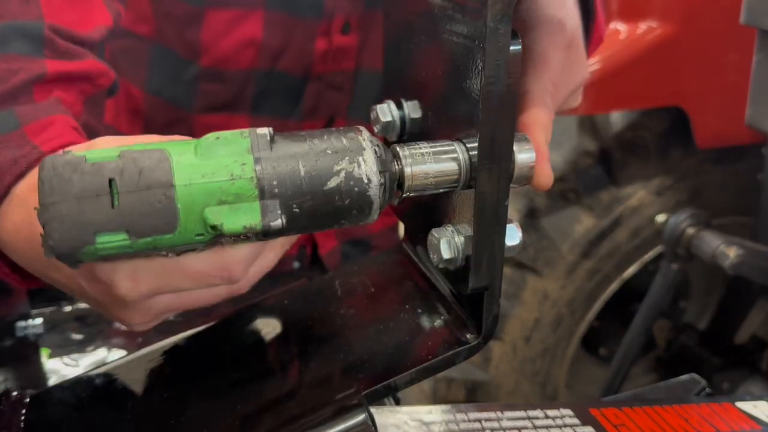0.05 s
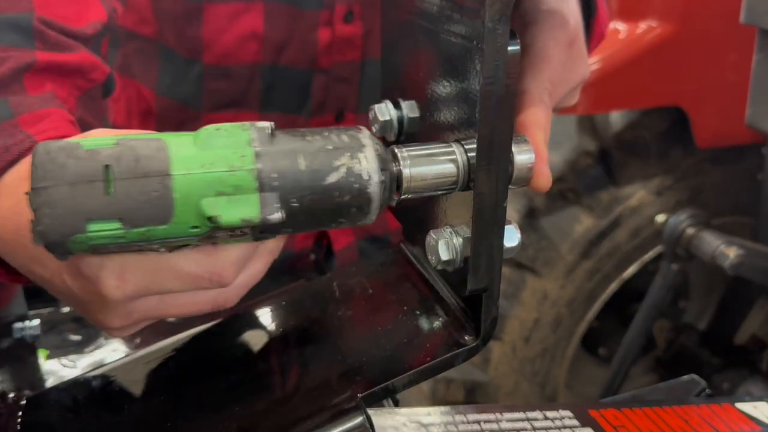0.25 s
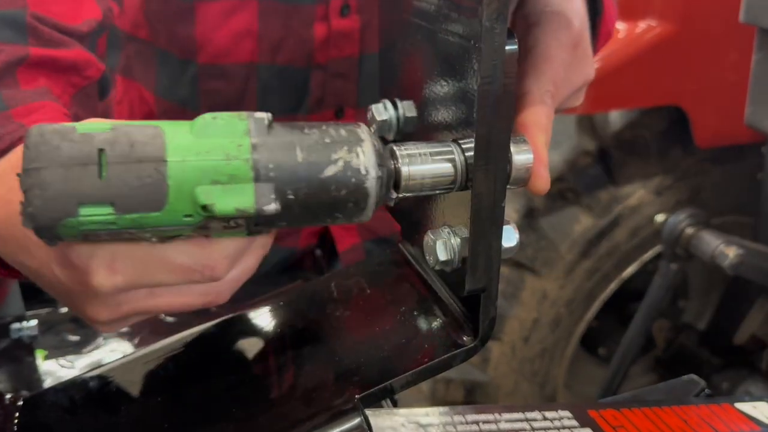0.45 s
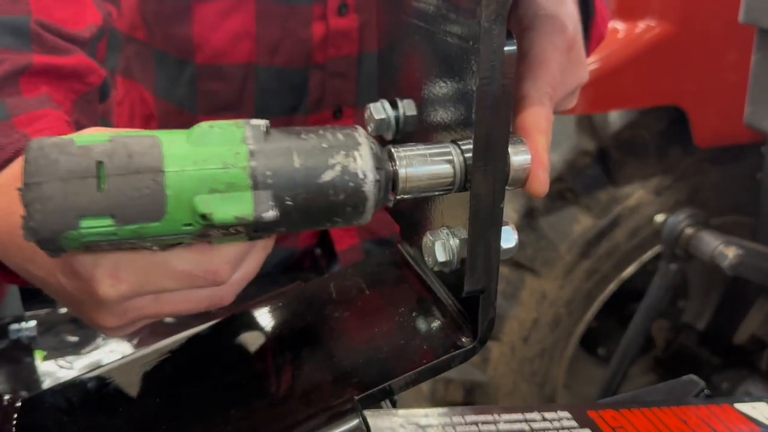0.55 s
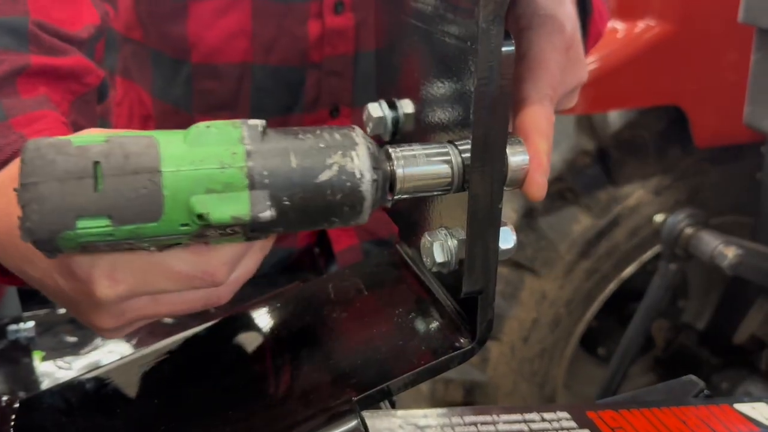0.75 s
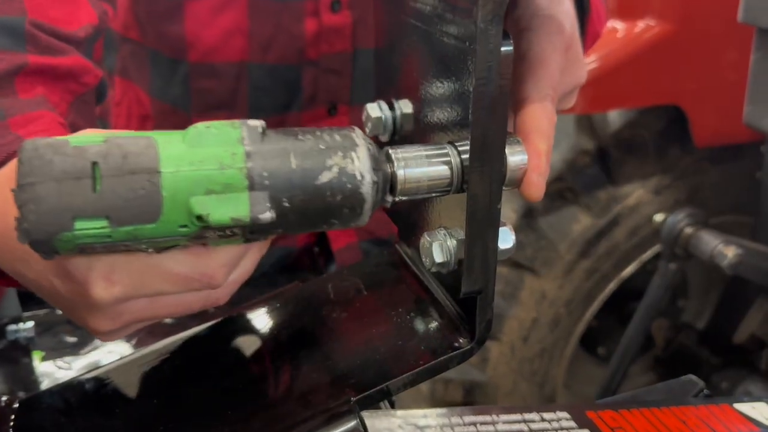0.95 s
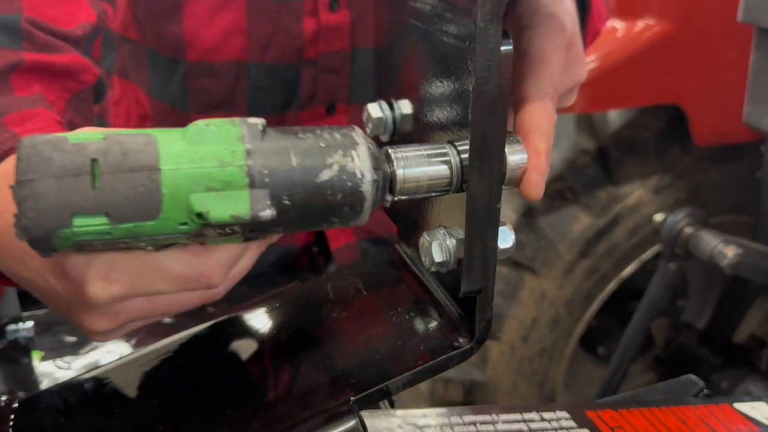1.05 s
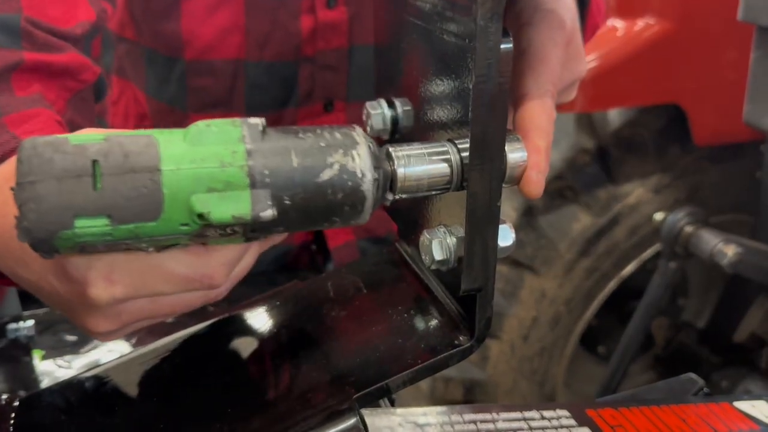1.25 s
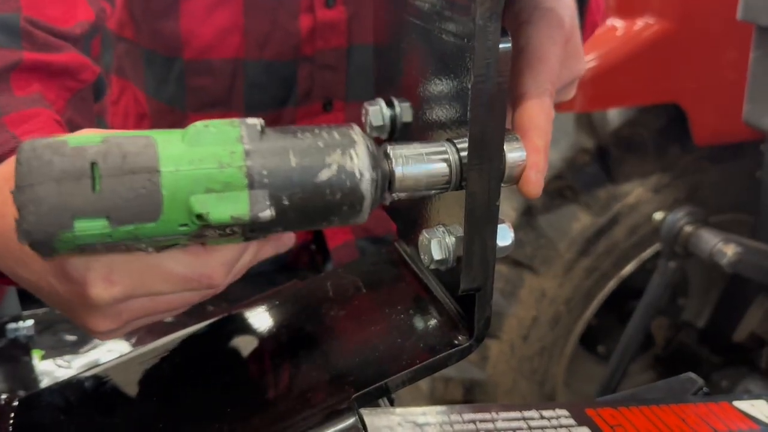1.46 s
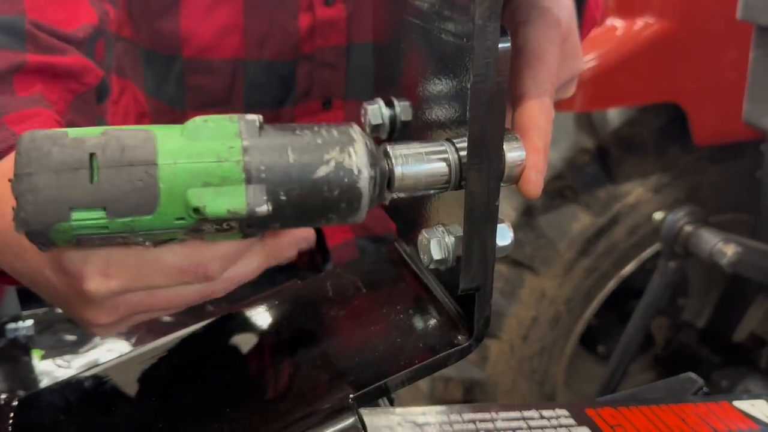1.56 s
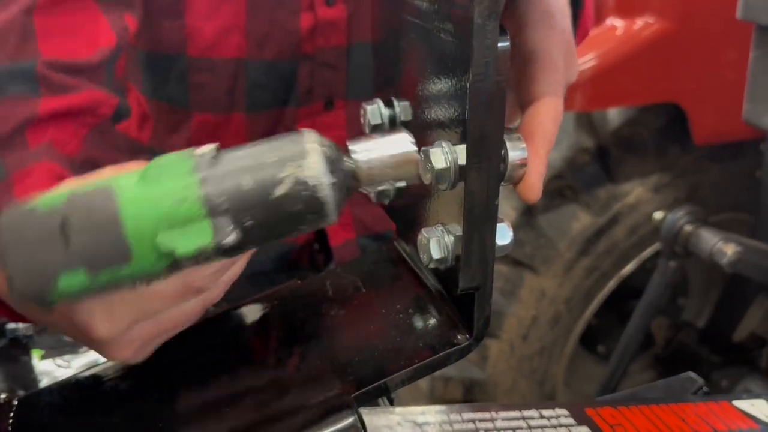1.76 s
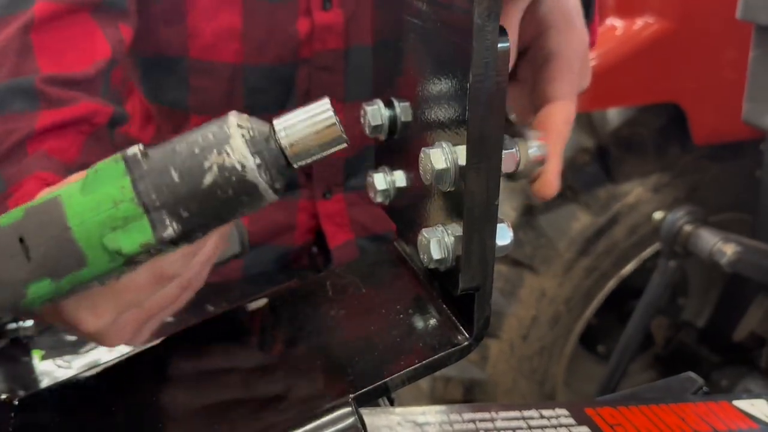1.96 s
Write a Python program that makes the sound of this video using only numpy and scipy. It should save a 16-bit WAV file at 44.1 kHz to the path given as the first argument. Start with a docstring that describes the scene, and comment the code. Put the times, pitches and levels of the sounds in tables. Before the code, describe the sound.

A cordless impact wrench starts at about 0.2 seconds in a quiet workshop, its gears rasping under very fast, even metallic hammering. The blows are close and loud, slightly overloading the microphone. From about 1.1 seconds a steel ring grows as the bolt seats. At 1.7 seconds the drive stops with a low knock, the socket rattles lightly and the steel rings out briefly into the room.

```python
"""A workshop, one microphone close to a cordless impact wrench tightening a bolt.
The gears rasp and the hammer strikes the anvil about 46 times a second; a steel ring at the bolt,
about 1-1.7 kHz, grows as it seats. The trigger is let go, the drive knocks to a stop and the steel
rings out into the room. At this distance the loud blows overload the recorder."""
import sys
import numpy as np
from scipy import signal
from scipy.fft import rfft, irfft
from scipy.io import wavfile
from scipy.ndimage import uniform_filter1d

SR = 44100
rng = np.random.default_rng(int(sys.argv[2]) if len(sys.argv) > 2 else 0)


def transcribe(signal):
    """Save signal, clipped to [-1, 1], as a 16-bit WAV file at the path in sys.argv[1]."""
    frames = np.atleast_2d(signal).T
    limited = np.clip(frames, -1, 1)
    pcm = np.round(limited * 32767).astype(np.int16)
    wavfile.write(sys.argv[1], SR, pcm)


N = 88200
TIME = np.arange(N) / SR
CONTACT_RISE_S, CONTACT_FALL_S = 0.0021, 0.0062


def amp(db):
    """Decibels to gain."""
    return 10 ** (np.asarray(db) / 20)


def unit(x):
    """Scales to an rms of one."""
    return x / np.sqrt(np.mean(x ** 2) + 1e-20)


def level(curve, t=TIME):
    """Gain along a dB curve in time."""
    return amp(np.interp(t, *np.transpose(curve)))


def at_hz(points, hz):
    """Reads a table on a log-frequency axis."""
    f, value = np.transpose(points)
    return np.interp(np.log(hz + 1), np.log(f + 1), value)


def noise(spectrum):
    """Steady noise of unit rms with the given spectral shape."""
    gains = amp(at_hz(spectrum, np.fft.rfftfreq(N, 1 / SR)))
    return unit(irfft(rfft(rng.standard_normal(N)) * gains, N))


def convolve(x, response):
    """Plays x through an impulse response."""
    return signal.fftconvolve(x, response)[:N]


def impulses(times, gains):
    """One impulse at each time."""
    return np.bincount(np.clip(np.round(times * SR).astype(int), 0, N - 1), gains, N)


def burst(hits):
    """Envelope of the brief chatter of steel on steel after each hit."""
    shape = (1 - np.exp(-(TIME / CONTACT_RISE_S) ** 2)) * np.exp(-TIME / CONTACT_FALL_S)
    return convolve(hits, shape)


def ring(hits, modes, loose):
    """Modes struck by the hits; a loose contact (0 to 1) adds chatter that differs from blow to blow."""
    chatter = unit(burst(hits) * rng.standard_normal(N))
    push = (1 - loose) * unit(hits) + loose * chatter
    sound = np.zeros(N)
    for hz, db, t60 in modes:
        onset = np.tanh(TIME * hz / 2) ** 2
        swing = onset * amp(-60 * TIME / t60) * np.sin(2 * np.pi * hz * TIME)
        sound += amp(db) * unit(convolve(push, np.gradient(swing)))
    return sound


def thud(hits, spectrum, t60):
    """A struck body with many close, quickly dying modes."""
    shape = noise(spectrum) * amp(-60 * TIME / t60) * (1 - np.exp(-TIME / CONTACT_RISE_S))
    return unit(convolve(hits, shape))


def patchy(x, depth_db):
    """Gives each blow a slightly different colour, in patches about 1 kHz wide."""
    spectra = signal.stft(x, nperseg=256)[2]
    patches = uniform_filter1d(rng.standard_normal(spectra.shape), size=6, axis=0)
    patches = uniform_filter1d(patches, size=5, axis=1)
    return signal.istft(spectra * amp(depth_db * unit(patches)), nperseg=256)[1][:N]


# the quiet shop at the microphone (frequency [Hz], relative level [dB])
SHOP_SPECTRUM = [(25, -4), (60, -3), (150, -6), (480, 10), (1000, -2), (2100, 1), (6000, -33), (15000, -31)]


def room_tone():
    """The faint, steady background of the workshop."""
    return amp(-77) * noise(SHOP_SPECTRUM)


# gear rasp through the run (time [s], level [dB])
GEAR_LEVEL = [(.21, -78.5), (.22, -11), (.235, -7.5), (.25, -8), (.27, -2.5), (1.45, 2), (1.6, 0),
              (1.698, -5), (1.72, -41), (1.76, -51), (1.95, -41.5)]
# the gears from close by (frequency [Hz], relative level [dB])
GEAR_SPECTRUM = [(30, -33), (150, -9.5), (400, -24), (800, -0.5), (1300, -9), (2200, 0.5), (3600, -1),
                 (6500, -7.5), (9000, -16), (15000, -18.5)]


def gears(clicks):
    """The gear train rasps for as long as the motor turns, and clicks as it runs down."""
    return amp(-15.5) * (level(GEAR_LEVEL) + burst(clicks)) * noise(GEAR_SPECTRUM)


# pace of the hammer under load (time [s], rate [blows/s])
BLOW_RATE = [(0.257, 42.76), (0.55, 45.72), (1.0, 45.81), (1.3, 47.74), (1.6, 48.54), (1.7, 38.18)]
# force of the blows (time [s], level [dB])
BLOW_FORCE = [(.26, -2.5), (.6, 0.5), (1.0, 0), (1.25, 0.5), (1.45, 2), (1.56, -5.5), (1.63, -5),
              (1.7, -11)]


def hammer(catch_s=.2265, start_s=.2580, stop_s=1.702, rebound_s=.008):
    """A light first catch, then nearly even blows; after each the hammer falls back on the anvil."""
    rate = np.interp(TIME, *np.transpose(BLOW_RATE)) * (TIME >= start_s) * (TIME < stop_s)
    count = np.ceil(np.cumsum(rate) / SR)
    times = np.append(catch_s, TIME[1:][np.diff(count) > 0])
    jitter, uneven_db, rebound_jitter = rng.standard_normal((len(times), 3)).T
    catch_db = -7 * (times < start_s)
    gains = level(BLOW_FORCE, times) * amp(uneven_db + catch_db)
    blows = impulses(times + .00012 * jitter, gains)
    rebounds = impulses(times + rebound_s + .0003 * rebound_jitter, gains * amp(1))
    return blows, rebounds


# steel-on-steel crack from close by (frequency [Hz], relative level [dB])
CRACK_SPECTRUM = [(40, -22), (200, -20), (800, -1.5), (2000, 2.5), (3600, 3), (6000, -0.5), (8500, -9),
                  (11500, -12), (15000, -11.5)]
# clatter of the housing (frequency [Hz], relative level [dB])
HOUSING_SPECTRUM = [(30, -39), (130, -18.5), (260, -3), (600, -4.5), (950, -0.5), (1700, 0.5), (2200, -5),
                    (3500, -9), (7000, -25), (15000, -35.5)]
# how strongly the blows shake the housing (time [s], level [dB])
CLATTER_LEVEL = [(.23, 5), (.3, 0), (.6, 0), (1.0, -2.5), (1.2, 1.5), (1.45, 2.5), (1.55, -6.5),
                 (1.63, -14.5), (1.7, -17)]
# modes of the wrench with its socket (frequency [Hz], level [dB], t60 [s])
WRENCH_MODES = [(227.9, -27, 0.22), (267.7, -31, 0.061), (312.1, -22, 0.17), (448.2, -24.5, 0.24),
                (486.3, -22.5, 0.35), (978, -21.5, 0.04), (1350, -27.5, 0.14), (1827, -25, 0.072),
                (2118, -22.5, 0.11), (2175, -26, 0.065), (2910, -29.5, 0.042), (3524, -25, 0.024),
                (4197, -25.5, 0.11), (5666, -29.5, 0.056)]


def wrench(blows, rebounds):
    """Each blow cracks on the anvil and rings the wrench; blow and rebound shake the housing."""
    crack = unit(burst(blows) * patchy(noise(CRACK_SPECTRUM), depth_db=3.2))
    housing = thud((blows + rebounds) * level(CLATTER_LEVEL), HOUSING_SPECTRUM, t60=0.062)
    ringing = ring(blows * level(CLATTER_LEVEL), WRENCH_MODES, loose=0.47)
    return amp(-14) * (crack + housing) + ringing


# low shudder of the frame (time [s], level [dB])
SHUDDER_LEVEL = [(.23, -33), (.33, -25), (.47, 2.5), (.95, -24.5), (1.1, 0), (1.42, 7), (1.6, -7),
                 (1.7, -15)]
# the frame from close by (frequency [Hz], relative level [dB])
FRAME_SPECTRUM = [(10, -30), (30, -20), (55, -6), (130, -6.5), (260, 5), (450, -11.5), (900, -11.5),
                  (4000, -56)]


def frame(beats):
    """The blows set the frame shuddering."""
    return amp(-25) * thud(beats * level(SHUDDER_LEVEL), FRAME_SPECTRUM, t60=0.21)


# strength of the blows at the bolt (time [s], level [dB])
SEATING_LEVEL = [(.25, -5.5), (.45, -12.5), (.85, -5), (1.06, -5.5), (1.16, 4.5), (1.4, 3.5), (1.5, 7),
                 (1.6, 5), (1.7, -6.5)]


def bolt(beats, lag_s=.007):
    """The bolt passes each blow on a moment later, harder once it seats."""
    return np.roll(beats, round(lag_s * SR)) * level(SEATING_LEVEL)


# modes of the socket on the nut (frequency [Hz], level [dB], t60 [s])
SOCKET_MODES = [(2907, -23, 0.075), (2960, -32, 0.073), (4230, -29.5, 0.056)]


def socket(hits):
    """The socket, loose on the nut, rings high and short."""
    return ring(hits, SOCKET_MODES, loose=0.53)


# steel ring at the bolt (frequency [Hz], level [dB], t60 [s])
STEEL_RING_MODES = [(1036, -27.5, 0.1), (1050, -28, 0.26), (1089, -29, 0.4), (1162, -26, 0.18),
                    (1330, -23, 0.39), (1371, -26, 0.098), (1555, -29.5, 0.081), (1688, -29, 0.22)]


def steel_ring(hits):
    """Struck steel rings at the bolt, about 1-1.7 kHz, growing as it seats."""
    return ring(hits, STEEL_RING_MODES, loose=0.53)


# short pings of the nut (frequency [Hz], level [dB], t60 [s])
NUT_MODES = [(1100, -22, .03), (1340, -17.5, .035)]


def nut(blows, lag_s=.0095, jitter_s=.0004):
    """The nut springs back with one short ping after each blow."""
    times = TIME[blows > 0]
    late = lag_s + jitter_s * rng.standard_normal(len(times))
    return ring(impulses(times + late, level(SEATING_LEVEL, times)), NUT_MODES, loose=0)


# reverberation of the workshop (frequency [Hz], t60 [s])
ROOM_DECAY = [(100, 0.89), (500, 0.67), (1200, 0.76), (3000, 0.43), (6500, 0.35), (9000, 0.12),
              (15000, 0.6)]


def workshop(x, cutoff_hz=8000):
    """The room returns a dull, diffuse tail to the microphone; the lows last longest."""
    hz, t, spectra = signal.stft(rng.standard_normal(N), SR, nperseg=256)
    dull = 1 / np.sqrt(1 + (hz[:, None] / cutoff_hz) ** 10)
    decay = amp(-60 * t / at_hz(ROOM_DECAY, hz)[:, None])
    tail = signal.istft(spectra * dull * decay, SR, nperseg=256)[1][:N]
    return convolve(x, tail / np.linalg.norm(tail))


def brake(start_s=1.690, hz=320, rise_s=.016, t60=.15):
    """The braking motor jolts the body of the wrench into a low ring."""
    t = np.maximum(TIME - start_s, 0)
    onset = 1 - np.exp(-(t / rise_s) ** 2)
    return onset * amp(-7 - 60 * t / t60) * np.sin(2 * np.pi * hz * t)


# the last light rattle (time [s], click level [dB], ringing tap level [dB])
RATTLE_HITS = [(1.712, -16, -27), (1.741, -35, -12), (1.755, -37, -28), (1.771, -35, -22),
               (1.797, -16, -22), (1.84, -38, -30)]


def rattle():
    """The socket rattles on the nut as the motor runs down: impulses for the gears and the steel ring."""
    times, click_db, tap_db = np.transpose(RATTLE_HITS)
    return impulses(times, amp(click_db)), impulses(times, amp(tap_db))


def scene():
    """Mono, close up: tool and steel carry into the room, the low jolts stay dry at the microphone."""
    blows, rebounds = hammer()
    beats = blows / level(BLOW_FORCE)  # the blows without their force curve
    bolt_hits = bolt(beats)
    clicks, taps = rattle()
    tool = wrench(blows, rebounds) + gears(clicks) + socket(bolt_hits)
    steel = steel_ring(bolt_hits + taps) + nut(blows)
    jolts = frame(beats) + brake()
    room = workshop(amp(-17) * tool + amp(-18.5) * steel)
    return (tool + steel + jolts + room + room_tone())[None]


def record(dry):
    """The recorder's limiter eases the loud blows down, the peaks round off and the band ends steeply."""
    threshold_db, ratio, recover_db_per_s = -6, 2, 22
    ceiling, knee, edge_hz = 0.59, 7.5, 15850
    x = dry[0]
    power_db = 10 * np.log10(abs(uniform_filter1d(x ** 2, size=220)) + 1e-12)
    recovery_db = TIME * recover_db_per_s
    held_db = np.maximum.accumulate(power_db + recovery_db) - recovery_db
    over_db = uniform_filter1d(np.maximum(held_db - threshold_db, 0), size=100)
    x = x / amp(over_db * (1 - 1 / ratio))
    x = x / (1 + abs(x / ceiling) ** knee) ** (1 / knee)
    lowpass = signal.firwin(511, edge_hz, window=("kaiser", 9), fs=SR)
    return signal.oaconvolve(x, lowpass, "same")[None]


dry = scene()
out = record(dry)
transcribe(out)
```